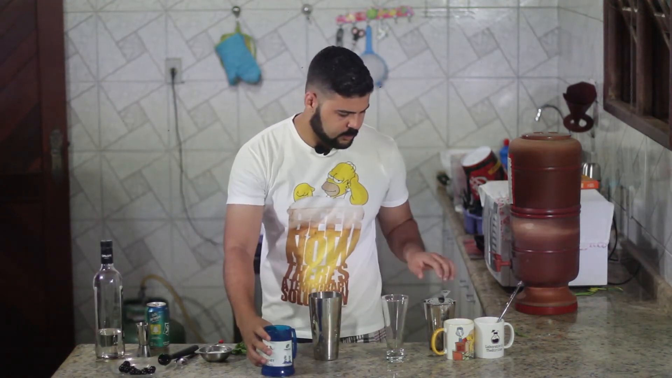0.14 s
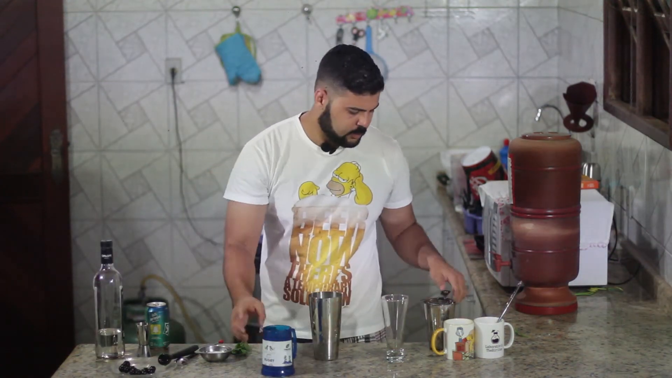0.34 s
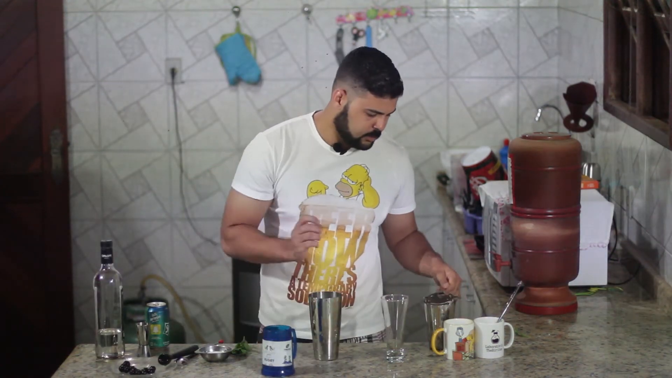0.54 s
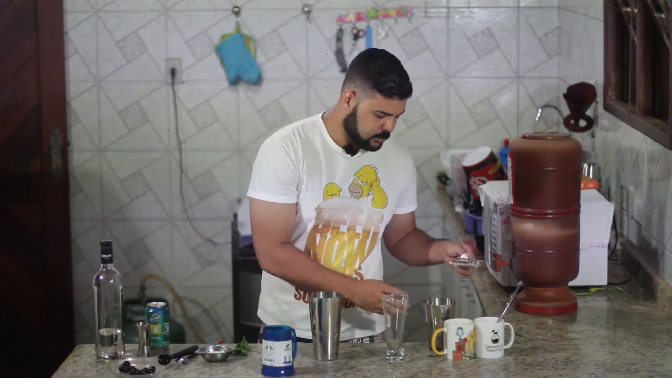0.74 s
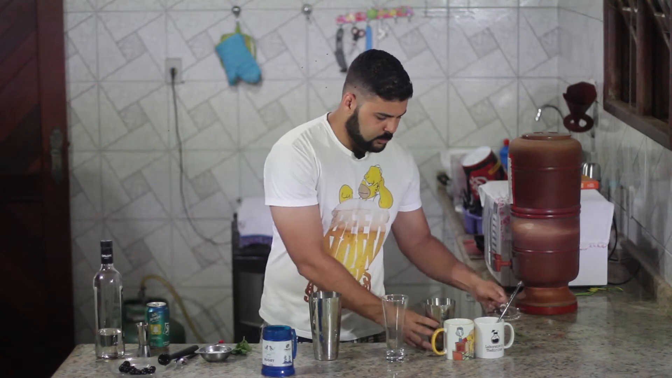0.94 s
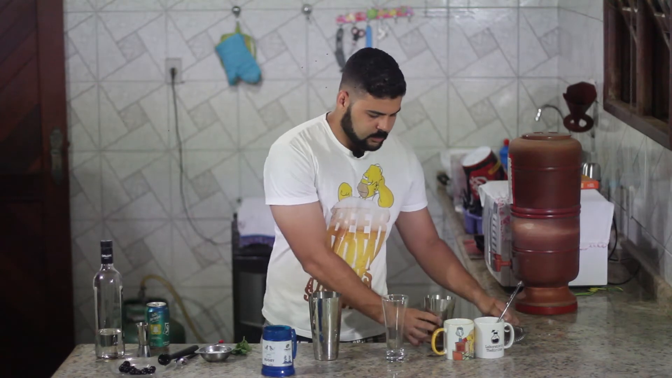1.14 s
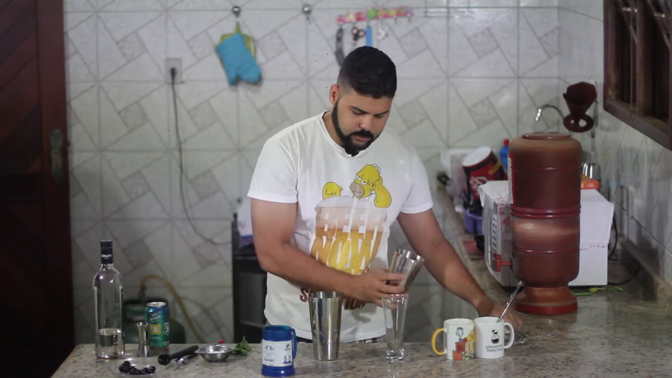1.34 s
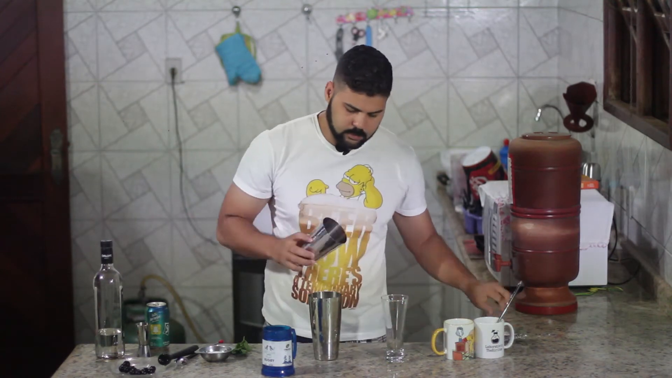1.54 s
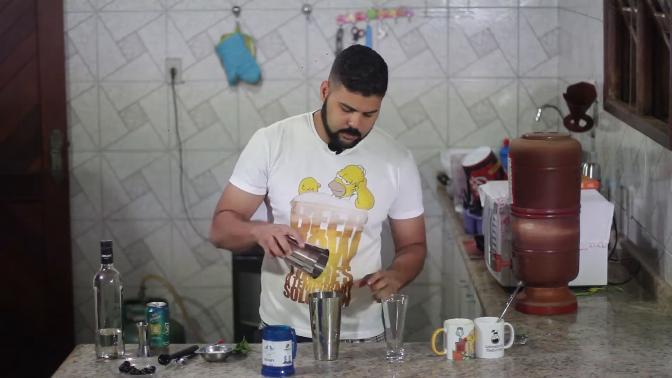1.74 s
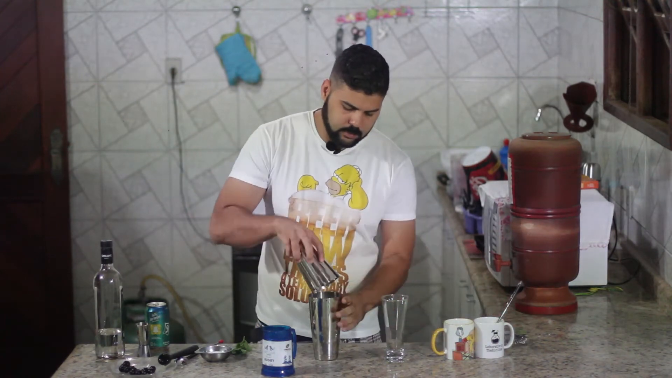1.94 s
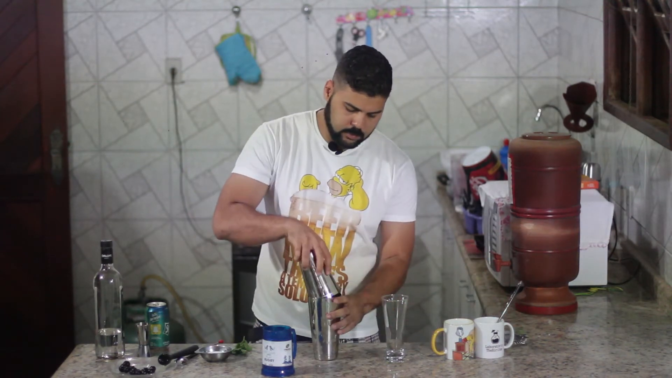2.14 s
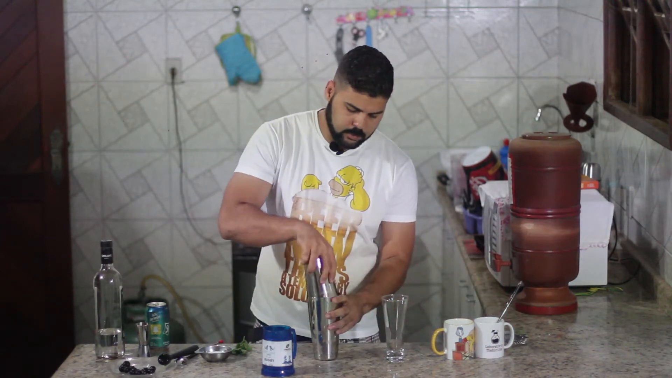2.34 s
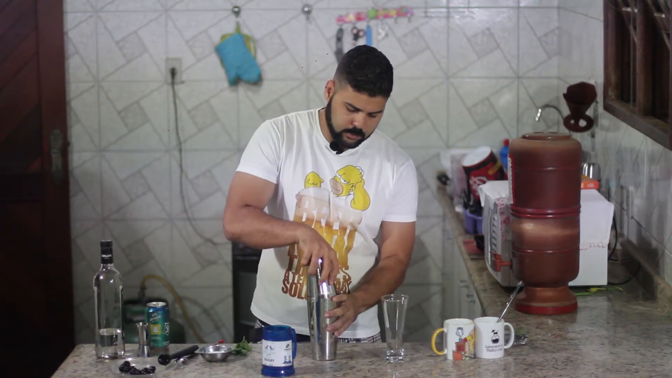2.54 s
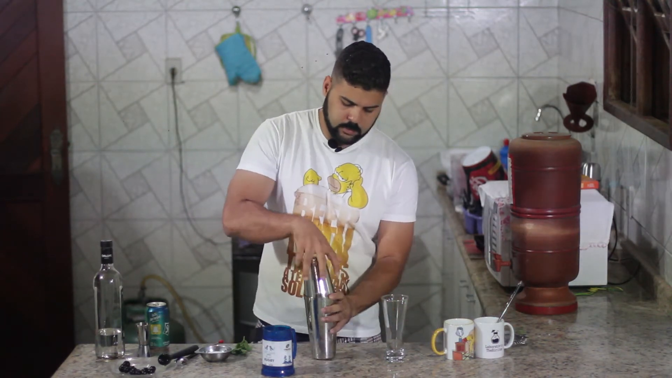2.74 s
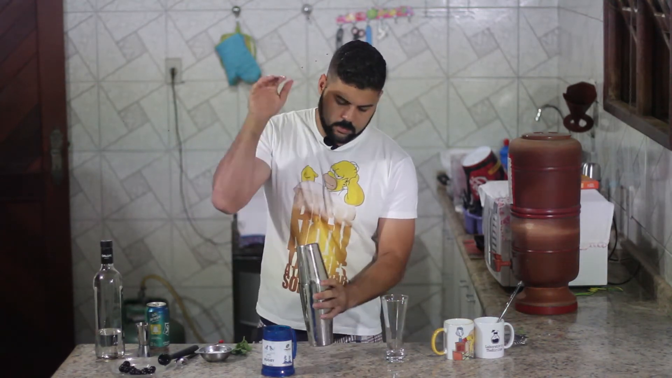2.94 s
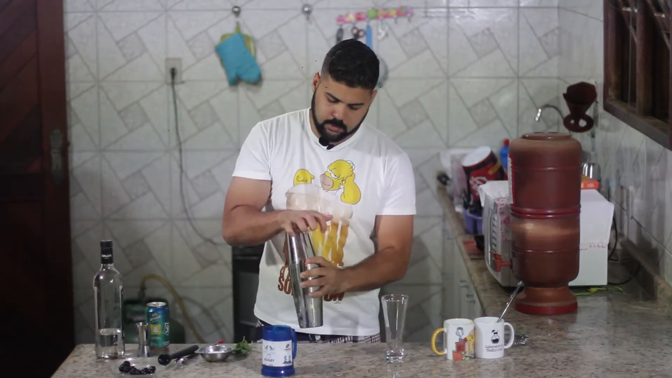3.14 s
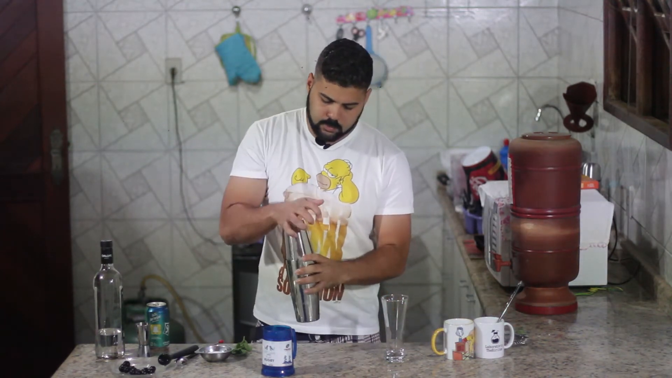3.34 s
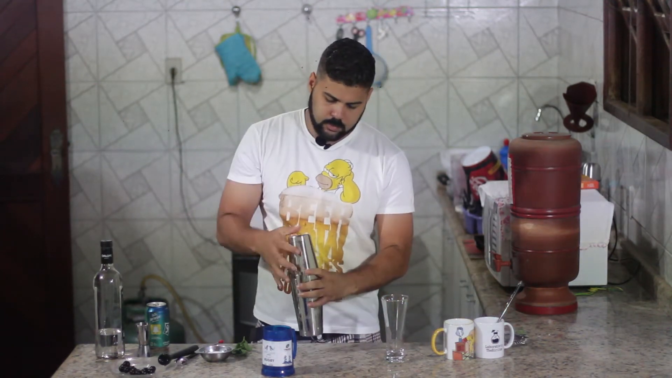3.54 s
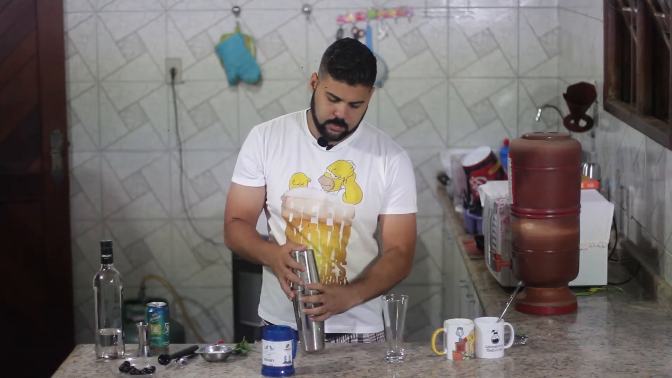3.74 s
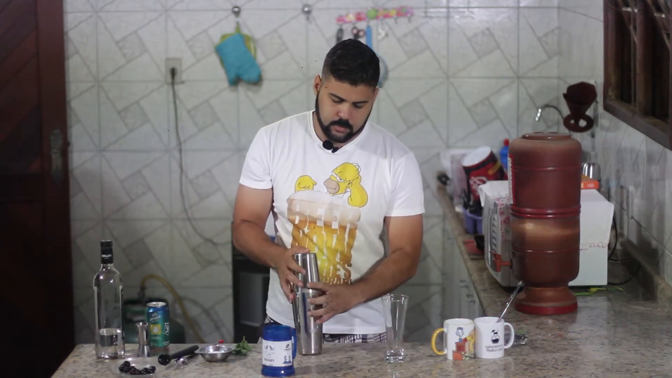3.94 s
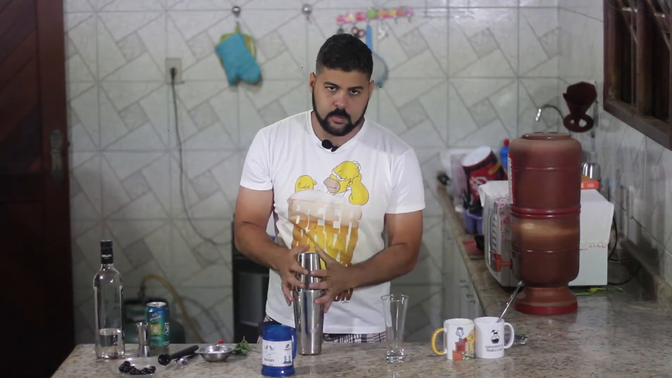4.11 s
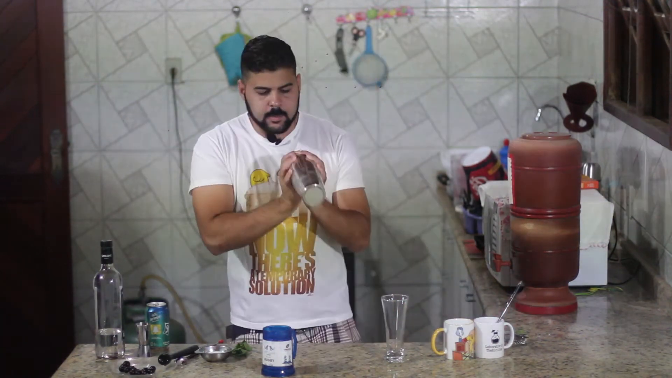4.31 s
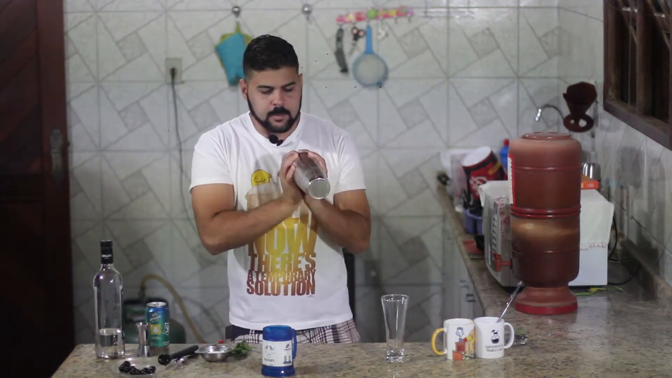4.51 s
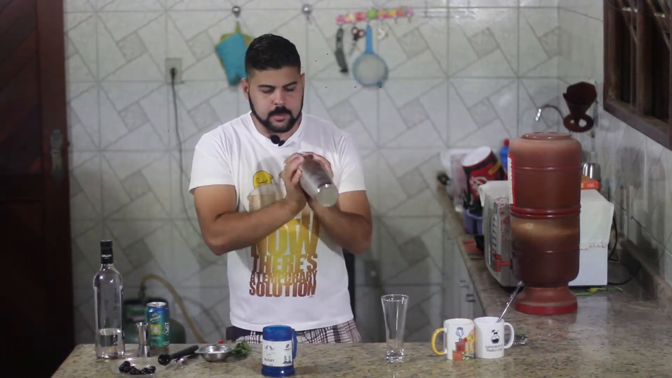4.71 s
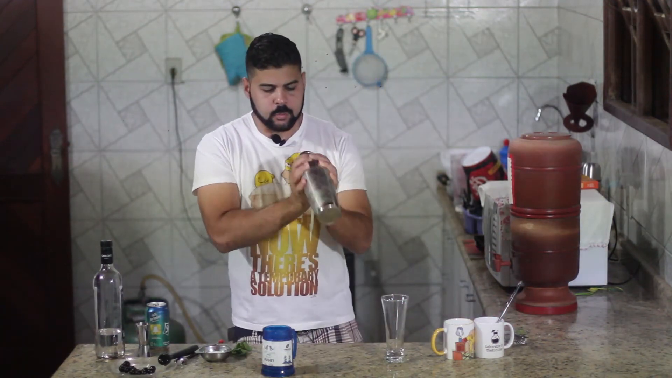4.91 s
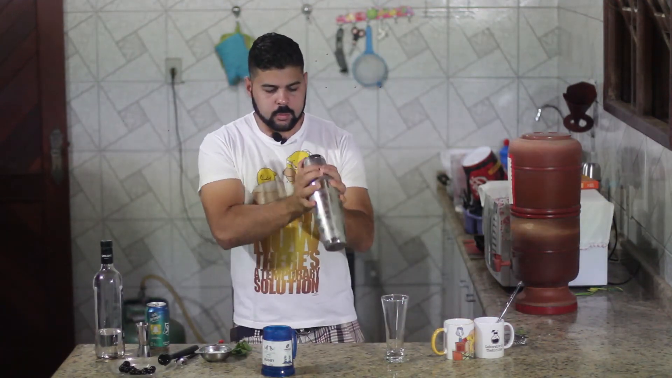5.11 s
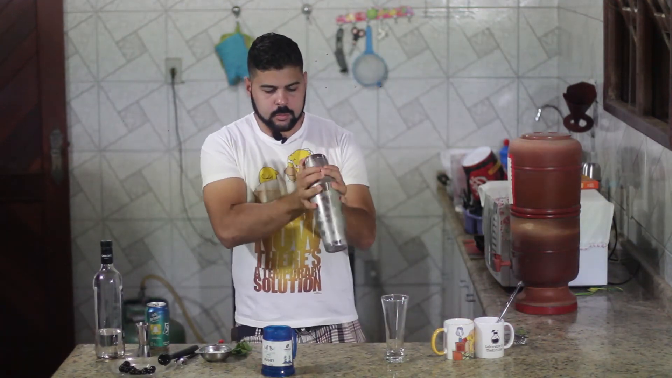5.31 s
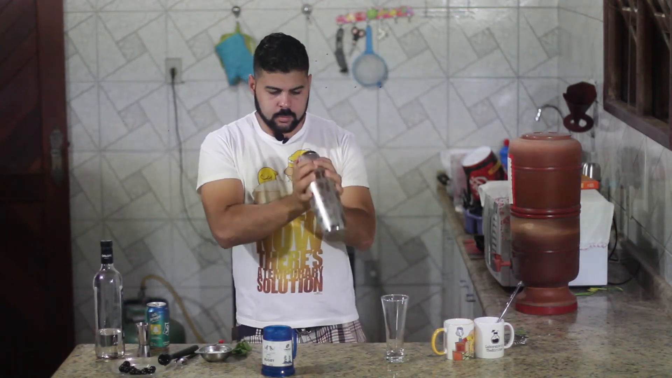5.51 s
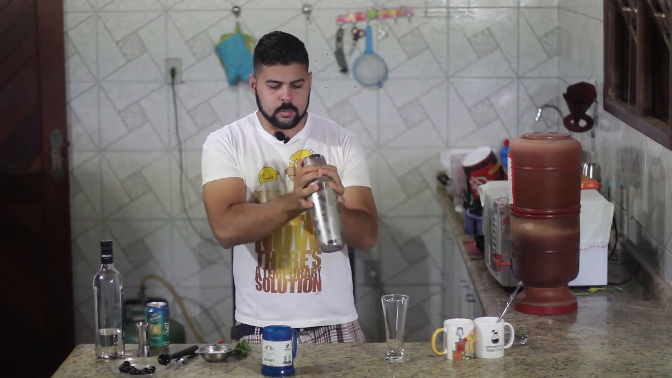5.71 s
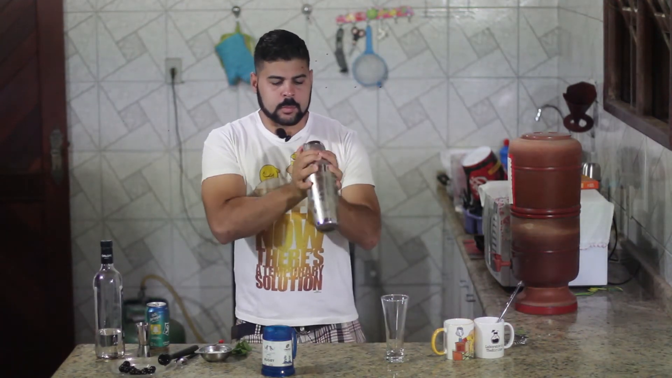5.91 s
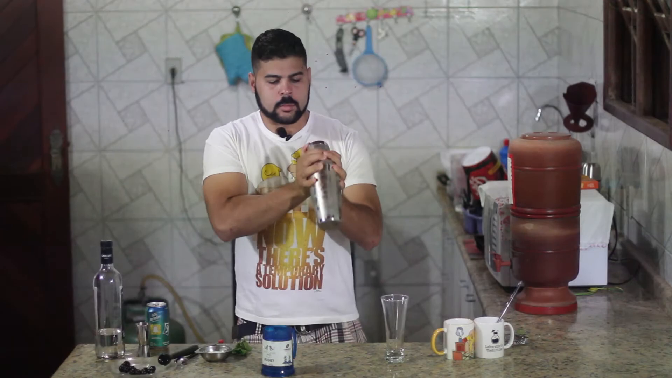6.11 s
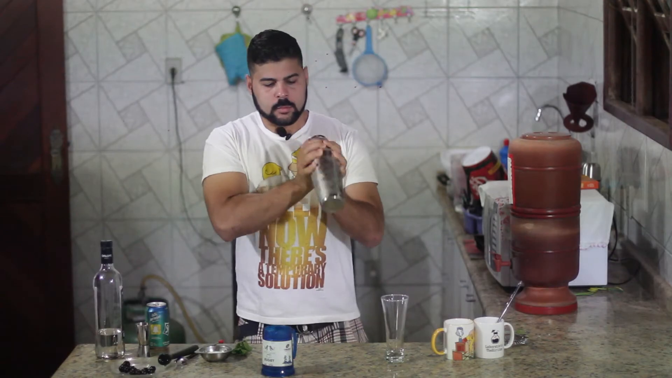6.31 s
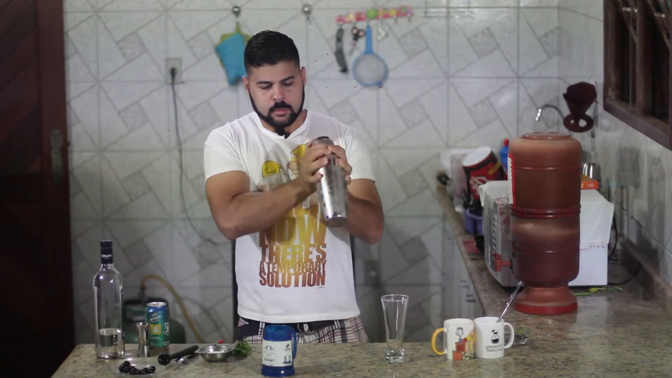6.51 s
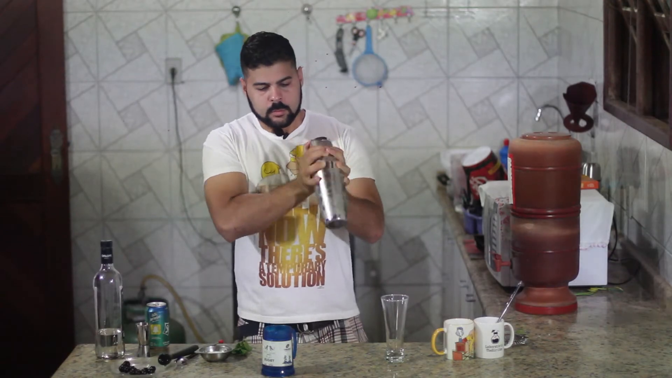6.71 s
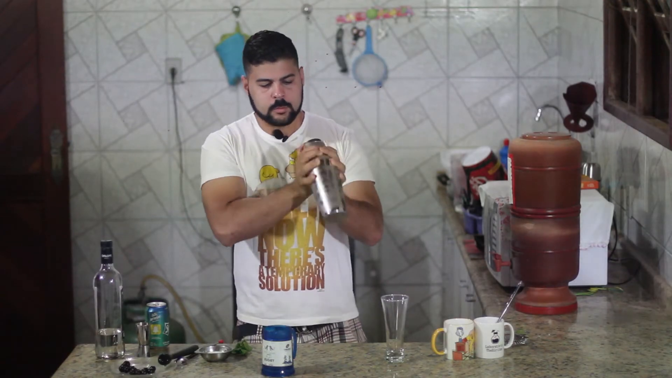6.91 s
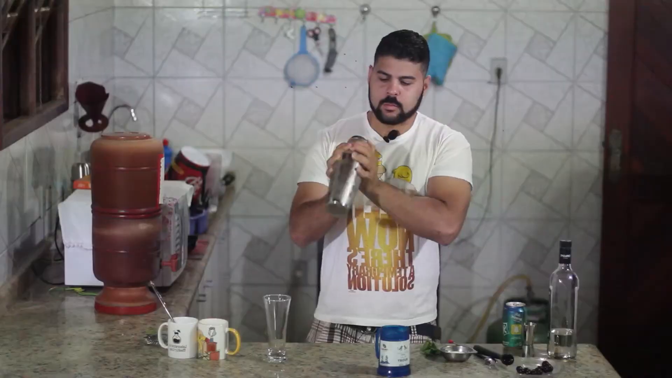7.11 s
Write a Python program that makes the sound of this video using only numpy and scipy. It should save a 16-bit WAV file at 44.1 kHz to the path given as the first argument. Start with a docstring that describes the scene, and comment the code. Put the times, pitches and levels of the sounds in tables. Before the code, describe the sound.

A jar knocks on stone, steel lids clink, and a cocktail shaker is slapped shut, set down, then shaken hard with rattling ice.

```python
"""Ice in a steel shaker

A tiled kitchen from a chest microphone. A jar knocks on a stone counter; steel lids slide, clink and
are fitted. A palm slaps the shaker shut; it is set down, then shaken hard. The load lands at lid and
base in turn: ice cracks on the wall, the tin rings, chips and liquid rattle between the blows.
Knocks are filtered bursts plus decaying modes; friction and rattle are filtered random clicks."""
import sys
import numpy as np
from scipy import signal
from scipy.io import wavfile
from scipy.ndimage import uniform_filter1d

SR = 44100
rng = np.random.default_rng(int(sys.argv[2]) if len(sys.argv) > 2 else 0)


def unload_wav(signal):
    """Save mono or channel-first audio to the path in sys.argv[1] as 16-bit WAV at rate SR, clipped to [-1, 1]."""
    wavfile.write(
        sys.argv[1],
        SR,
        np.round(np.clip(np.atleast_2d(signal).T, -1, 1) * 32767).astype(np.int16),
    )


N = 320166

# Knocks: t/s, level/dB
JAR_HITS = [(.1265, -2.5)]
CLINK_HITS = [(0.6322, -19)]
CUP_HITS = [(0.634, -19), (1.142, -43), (1.154, -31)]
FIT_HITS = [(2.106, -24), (2.12, -18), (2.18, -24), (2.53, -40)]
SLAP_HITS = [(3.1838, -28), (3.186, -1.5)]
CRACK_HITS = [(3.2041, -10), (3.2794, -14), (3.3598, -21), (3.4052, -25), (3.454, -19), (3.5354, -22),
              (4.1943, -20), (4.2342, -10), (4.3071, -17), (4.3215, -15), (4.3824, -11), (4.3949, -7),
              (4.4123, -9), (4.4218, -4), (4.4767, -6), (4.5096, -9), (4.6179, -23), (4.6179, -7),
              (4.6463, -21), (4.6613, -6.5), (4.7545, -8.5), (4.8483, -13), (4.8838, -11), (4.9646, -10),
              (5.1397, -19), (5.1561, -9), (5.1676, -7), (5.2345, -8), (5.3327, -10), (5.3871, -15),
              (5.434, -17), (5.447, -2.5), (5.5238, -14), (5.6111, -9), (5.7648, -9.5), (5.8226, -8),
              (5.8835, -13), (5.9558, -9), (5.9818, -12), (5.9997, -8), (6.0262, -7), (6.0975, -11.5),
              (6.1249, -8.5), (6.1833, -5.5), (6.2781, -8), (6.301, -3), (6.4123, -11), (6.4956, -12),
              (6.5295, -11), (6.5435, -3.5), (6.5764, -12), (6.5854, -10), (6.6228, -5.5), (6.6692, -9),
              (6.6847, -6), (6.7171, -12), (6.735, -7), (6.7485, -10), (6.766, -5.5), (6.7964, -8.5),
              (6.9101, -12), (6.9101, -2.5), (6.9341, -1.5), (6.963, -6), (6.981, -3), (7.0683, -12),
              (7.1346, -2.5), (7.1651, 1.5), (7.203, -17), (7.203, -5.5)]
SET_DOWN_HITS = [(3.882, -2), (3.904, -3)]
# Contact spectra: f/Hz, density/dB
JAR_THUD = [(100, -52), (300, -6.5), (600, -6), (1200, -6), (2000, -17), (4300, -22), (7500, -27.5),
            (16000, -65.5)]
FIT_THUD = [(120, -28), (500, 5), (1300, -15), (1510, -6.5), (3040, -21.5), (6500, -32)]
SLAP_THUD = [(29, -54), (50, -2), (200, 2.5), (330, -4.5), (700, -8.5), (900, -15), (2440, -10),
             (2950, -17), (7570, -23.5), (16000, -34)]
SET_DOWN_THUD = [(29, -59), (50, -37), (85, -1), (240, -5.5), (765, -5), (1100, -12), (1820, -18.5),
                 (7570, -47.5), (16000, -65)]
LOAD_THUD = [(60, -3), (200, 0), (550, 14), (1000, 6.5), (2000, -3.5), (5000, -22)]
# Noise spectra: f/Hz, density/dB
AIR_COLOUR = [(60, -23), (120, -3), (270, -10), (650, -12), (1140, -20.5), (1430, -16.5), (1900, -27),
              (6000, -40), (15000, -58.5)]
RUMBLE_COLOUR = [(15, -34), (40, -36), (59, 12), (75, 2), (110, -18.5), (200, -63)]
STEEL_COLOUR = [(880, -2), (1500, -1), (1610, 2), (3380, -7.5), (3770, -13), (4460, -7), (5540, -8),
                (8000, 1.5), (13000, -11.5), (16000, -1.5)]
RUB_COLOUR = [(90, -71), (300, 2.5), (435, -2.5), (871, 2.5), (1170, -2), (2100, -8), (2500, -32),
              (8000, -73)]
SETTLE_COLOUR = [(120, -43), (200, -48), (1100, -7), (1500, -0.5), (1770, -5), (2020, -4), (6280, -14),
                 (16000, -29)]
CHIP_COLOUR = [(1500, -30.5), (3200, 0.5), (4000, -9.5), (5000, -3), (6300, 5.5), (8500, -2.5),
               (11000, -10), (16000, -22)]
SLUSH_COLOUR = [(100, -39), (250, -15.5), (600, -3.5), (900, -7.5), (1300, 1.5), (2000, 1.5), (2500, 2),
                (3200, 3.5), (3900, -5), (7000, -39.5)]
SPRAY_COLOUR = [(4000, -39), (7000, -35), (10000, 13.5), (13000, 12), (16000, 1)]
# Struck modes: f/Hz, level/dB, t60/s
JAR_MODES = [(279.5, -9, 0.061), (376, -9, 0.12)]
CUP_MODES = [(2360, 0, .3), (2729, -6, .65), (4522, -17, .4), (5173, -18, .5), (5484, -23, .95),
             (6562, -24, .7), (6831, -9, .33), (7068, -20, .45), (8300, -22, .3), (10260, -25, .4),
             (11620, -28, .25)]
STONE_MODES = [(387, -4.5, 0.079), (680, 2.5, 0.075), (750, 4.5, 0.024)]
OPEN_TIN_MODES = [(515, 0, 0.056), (985, -12.5, .15), (1477.5, -14.5, 0.62), (2770, -23, 0.12),
                  (4480, -18, 0.042), (6900, -15, 0.039)]
FULL_TIN_MODES = [(83, -12, 0.63), (2250, -18, 0.38)]
# Swells: peak t/s, level/dB, rise/s, t60/s
RUMBLE_SWELLS = [(1.53, -47, 0.047, 0.16), (1.88, -43.5, 0.056, 0.33), (3.752, -50, 0.083, 0.24)]
RUB_SWELLS = [(2.2, -49, .01, 0.35), (2.536, -48.5, 0.19, 1), (3.036, -56, 0.11, 0.49)]
# Envelopes, lists of: t/s, level/dB
CREAK_CURVES = [
    [(1.36, -70), (1.41, -57), (1.49, -54.5), (1.56, -88)],
]
SETTLE_CURVES = [
    [(3.19, -15), (3.25, -20), (3.59, -33.5), (3.8, -103)],
]
# Jar cavity: t/s, level/dB, f/Hz, t60/s
JAR_AIR = [(.128, -13, 778, 0.25), (.134, 1, 740, 0.078), (.176, -6, 730.3, 0.19)]
# Room decay: f/Hz, t60/s
ROOM_DECAY = [(100, 0.4), (600, 0.53), (2000, 0.57), (6000, 0.37), (14000, 0.35)]
# Lid slides: peak t/s, level/dB, rise/s, t60/s, ring/dB, ring tilt/(dB/octave)
SLIDES = [(0.582, -46, 0.052, 0.081, -9, -5), (0.616, -37, 0.018, 0.14, 4, 0),
          (1.159, -46, 0.02, 0.24, 1, 8), (1.343, -43.5, 0.013, 0.29, -8, 8),
          (1.477, -54.5, 0.059, 0.13, -15, 9), (1.80, -49, 0.024, 0.25, -6.5, -1),
          (2.121, -37, 0.016, 0.063, -6.5, -18), (2.189, -41, 0.013, 0.23, -8, -11),
          (2.265, -44, 0.016, 0.24, -11, -4), (2.39, -52, 0.034, 0.11, -7, -26)]
# Lid modes: f/Hz, width/Hz, level/dB
LID_MODES = [(4500, 110, -6), (5150, 60, -5), (6842, 60, -2), (7570, 40, -4), (8260, 90, 0), (9320, 50, -5),
             (10300, 50, -6), (10850, 90, -9), (12100, 60, -8), (13200, 50, -7)]
# Pitched taps: t/s, level/dB, f/Hz
TICKS = [(0.978, -53, 2730), (2.7894, -52, 3380)]
CLANKS = [(4.3211, -9, 1700), (4.414, -13, 2050), (4.9788, -13, 1980), (5.0769, -8.5, 1810),
          (5.1578, -16.5, 2020), (5.2502, -13, 2000), (5.369, -15, 2010), (5.4487, -10, 1700),
          (5.5414, -12, 2090), (6.0187, -14, 1870), (6.1262, -11.5, 2010), (6.2038, -12.5, 1900),
          (6.3087, -15, 2060), (6.5315, -11.5, 2980), (6.6204, -18, 1940), (6.7168, -10.5, 2080),
          (6.7375, -11.5, 1990), (6.9036, -8.5, 2120), (6.9629, -6, 1885), (7.0977, -15, 1950),
          (7.1665, -7.5, 1810), (7.2047, -9, 1930)]
# Faint tones: start/s, end/s, f/Hz, level/dB
HUMS = [(2.53, 2.8, 878, -51), (2.48, 2.62, 2090, -58)]
# Load landings, lid and base in turn: t/s, slush/dB, chips/dB, thump/dB, ring/dB, ring t60/s
STROKES = [(4.236, -18.5, -22, -20, -19, 0.059), (4.3206, -18.5, -20.5, -28, -4.5, 0.024),
           (4.415, -19, -18.5, -19.5, -39, 0.043), (4.509, -19.5, -20.5, -18.5, -19, 0.025),
           (4.615, -23, -22.5, -21.5, -16.5, 0.03), (4.695, -17, -18.5, -23.5, -7.5, 0.092),
           (4.79, -30, -20.5, -25.5, -42, .05), (4.884, -17.5, -20.5, -27, -11.5, 0.14),
           (4.968, -23, -23, -19.5, -22, 0.073), (5.073, -20, -18.5, -25.5, -14, 0.11),
           (5.159, -21.5, -24.5, -23.5, -30, 0.06), (5.25, -21.5, -18.5, -29, -15.5, 0.15),
           (5.366, -29, -24.5, -27, -20.5, 0.033), (5.4486, -20.5, -25, -22, -5.5, 0.047),
           (5.544, -20, -20, -22.5, -39, 0.055), (5.640, -24.5, -21.5, -25.5, -11, 0.053),
           (5.765, -51, -30, -43, -47, 0.055), (5.839, -21.5, -20.5, -24.5, -19.5, 0.18),
           (5.954, -28, -22.5, -28, -20, 0.075), (6.0264, -20, -19, -19.5, -4.5, 0.14),
           (6.126, -29, -22, -23, -37, 0.033), (6.2207, -17.5, -17.5, -20, -21, 0.12),
           (6.309, -24.5, -20.5, -20, -38, 0.036), (6.421, -19, -21, -32, -14.5, 0.025),
           (6.4956, -23, -22.5, -18, -14.5, 0.037), (6.6225, -17, -17.5, -29, -9.5, 0.026),
           (6.7176, -25, -21.5, -23, -19, 0.032), (6.801, -20, -20, -48, -18.5, 0.083),
           (6.905, -26, -24, -23, -16.5, 0.024), (7.004, -15.5, -18, -49, -19, 0.061),
           (7.098, -24, -18.5, -26, -30, 0.13), (7.166, -19, -24, -28, -12.5, 0.082)]
# Rattle shape at lid, at base: lag/s, rise/s, fall/s
SLUSH_SURGE = [(0.0095, 0.0067, 0.021), (0.0022, 0.012, 0.014)]
CHIP_SURGE = [(0.0038, 0.015, 0.017), (0.0013, 0.017, 0.01)]
# Treble flares: t/s
FLARES = [4.197, 4.385, 4.58, 4.76, 4.966, 5.141, 5.334, 5.525, 5.72, 5.884, 6.098, 6.278, 6.495, 6.67,
          6.872, 7.068]
# Jolt strength: t/s, level/dB
JOLT_CURVE = [(4.3, -42), (4.88, -25.5), (5.45, -40), (6.03, -30.5), (6.6, -50), (7.0, -29), (7.2, -31)]

TIN_HZ, SHAKE_START_S = 1458.3, 4.193


def amp(db):
    """Decibels to gain."""
    return 10 ** (np.asarray(db) / 20)


def unit_rms(x):
    """Scales to rms 1."""
    return x / np.sqrt(np.mean(x ** 2) + 1e-20)


def at_hz(points, hz):
    """Interpolates over log frequency."""
    f, value = np.transpose(points)
    return np.interp(np.log(hz + 1), np.log(f + 1), value)


def envelope(curves):
    """Smoothed gain from dB curves, silent outside them."""
    t, out = np.arange(N) / SR, np.zeros(N)
    for rows in curves:
        s, db = np.transpose(rows)
        out += amp(np.interp(t, s, db, -200, -200))
    return uniform_filter1d(out, size=60)


def swells(rows):
    """Gain with Gaussian rises and exponential decays."""
    t, out = np.arange(0, N, 32) / SR, 0
    for s, db, rise_s, t60_s in rows:
        out = out + amp(db - np.where(t < s, 20 * ((s - t) / rise_s) ** 2, 60 * (t - s) / t60_s))
    return np.interp(np.arange(N) / SR, t, out)


def colour(x, spectrum):
    """Minimum-phase filter of unit energy."""
    half = np.log(amp(np.maximum(at_hz(spectrum, np.fft.rfftfreq(8192, 1 / SR)), -100)))
    log_gain = np.concatenate([half, half[-2:0:-1]])
    taps = np.fft.ifft(np.exp(log_gain - 1j * signal.hilbert(log_gain).imag)).real[:4096]
    return signal.oaconvolve(x, taps / np.linalg.norm(taps))[:len(x)]


def resonate(x, hz, width_hz):
    """Two-pole resonance, peak gain 1."""
    return signal.lfilter(*signal.iirpeak(hz, hz / width_hz, SR), x)


def add(mix, s, sound):
    """Mixes a sound in at s seconds."""
    part = mix[round(s * SR):][:len(sound)]
    part += sound[:len(part)]


def grit(per_s, spread_db):
    """Random clicks, a few large."""
    size = amp(spread_db * np.minimum(rng.exponential(1, N), 3.8)) * rng.choice([-1, 1], N)
    return unit_rms(size * (rng.random(N) < per_s / SR))


def crunch(per_s, spread_db, decay_s):
    """Random noise bursts: ice grinding as it hits."""
    bursts = signal.lfilter([1], [1, -np.exp(-1 / (decay_s * SR))], abs(grit(per_s, spread_db)))
    return unit_rms(bursts * rng.standard_normal(N))


def ring(hz, t60_s, rise_s=0.00012, choke=1):
    """One decaying mode; choke > 1 holds it, then cuts it short."""
    t = np.arange(round(SR * min(t60_s, 1))) / SR
    return amp(-60 * (t / t60_s) ** choke) * (1 - np.exp(-t / rise_s)) * np.sin(2 * np.pi * hz * t)


def cluster(hz, octaves, t60_s):
    """Wall modes around hz, struck together."""
    return sum(ring(hz * 2 ** shift, t60_s, rise_s=0.00049) for shift in octaves)


def wall_grains(gain, per_s, band_hz, t60_s):
    """Each small collision rings one patch of the wall."""
    pitches, out = np.geomspace(*band_hz, num=10), np.zeros(N)
    hits = gain * grit(per_s, 4.2)
    patch = rng.integers(len(pitches), size=N)
    for k, hz in enumerate(pitches):
        out += signal.oaconvolve(hits * (patch == k), unit_rms(ring(hz, t60_s, rise_s=0.0001)))[:N]
    return out


def knocks(hits, thud, thud_db, contact_s, modes=(), ring_db=0, click=1):
    """Coloured click and contact noise, plus modes; click is the click-to-noise ratio."""
    contacts, rings, t = np.zeros(N), np.zeros(N), np.arange(2000) / SR
    for s, db in hits:
        burst = rng.standard_normal(len(t)) * np.exp(-t / contact_s)
        burst[0] = click * np.linalg.norm(burst)
        add(contacts, s, amp(db + thud_db) * burst / np.linalg.norm(burst))
        for hz, mode_db, t60_s in modes:
            add(rings, s, amp(db + ring_db + mode_db) * ring(hz, t60_s))
    return colour(contacts, thud) + rings


def room_noise():
    """Steady air and a swelling low rumble."""
    air = amp(-59.5) * colour(rng.standard_normal(N), AIR_COLOUR)
    rumble = (amp(-54) + swells(RUMBLE_SWELLS)) * colour(rng.standard_normal(N), RUMBLE_COLOUR)
    return air + rumble


def jar_down():
    """Hard, flat blow of a jar on stone."""
    return knocks(JAR_HITS, JAR_THUD, 1.6, contact_s=0.0005, modes=JAR_MODES, ring_db=-17, click=4)


def jar_hollow():
    """The jar's cavity sounds as it rocks."""
    out = np.zeros(N)
    for s, db, hz, t60_s in JAR_AIR:
        add(out, s, amp(db) * ring(hz, t60_s, rise_s=0.0057))
    return out


def kitchen_reverb(x):
    """Sparse reflections of random sign; each band decays at its own rate."""
    taps, slots = np.zeros(SR), np.arange(80, SR - 20, 20)
    taps[slots + rng.integers(0, 20, len(slots))] = rng.choice([-1., 1.], len(slots))
    hz, t, bands = signal.stft(taps, SR, nperseg=256)
    decay = amp(-60 * t / at_hz(ROOM_DECAY, hz)[:, None])
    tail = signal.istft(bands * decay, SR, nperseg=256)[1]
    return signal.fftconvolve(x, tail / np.linalg.norm(tail))[:N]


def lid_slides():
    """Rough contact hisses and drives the lid's modes; each grip damps them differently."""
    friction, out = grit(6000, 3.2), np.zeros(N)
    modes = np.array([amp(db) * resonate(friction, hz, width_hz) for hz, width_hz, db in LID_MODES])
    modes /= np.std(modes.sum(0))
    hiss = amp(-3.5) * colour(friction, STEEL_COLOUR)
    octaves = np.log2(np.array(LID_MODES)[:, 0] / LID_MODES[2][0])
    for *shape, ring_db, tilt_db in SLIDES:
        grip_db = -14 * rng.random(len(LID_MODES))
        singing = amp(ring_db + grip_db + tilt_db * octaves) @ modes
        out += swells([shape]) * (hiss + singing)
    return out


def cup_clink():
    """A tap rings a steel cup's high modes."""
    return knocks(CLINK_HITS, STEEL_COLOUR, 7.8, contact_s=0.0017, modes=CUP_MODES, ring_db=-20.5)


def cup_down():
    """The cup knocks on stone: low, short modes."""
    return knocks(CUP_HITS, JAR_THUD, 9.4, contact_s=0.0029, modes=STONE_MODES, ring_db=-10.5)


def ticks():
    """Faint ticks, one mode each."""
    out = np.zeros(N)
    for s, db, hz in TICKS:
        add(out, s, amp(db) * ring(hz, t60_s=0.011, rise_s=0.00016))
    return out


def creak():
    """A brief run of tiny pitched clicks."""
    return amp(-27.5) * wall_grains(envelope(CREAK_CURVES), 270, band_hz=(1840, 3340), t60_s=0.011)


def lid_fit():
    """The lid knocks on the open tin and rings it."""
    return knocks(FIT_HITS, FIT_THUD, 9.3, contact_s=0.0048, modes=OPEN_TIN_MODES, ring_db=-15)


def hand_rub():
    """Dull friction of hands on the tin."""
    return amp(-3) * swells(RUB_SWELLS) * colour(rng.standard_normal(N), RUB_COLOUR)


def hums():
    """Two faint tones swell and fade."""
    out = np.zeros(N)
    for start_s, end_s, hz, db in HUMS:
        t = np.arange(round((end_s - start_s) * SR)) / SR
        add(out, start_s, amp(db) * np.sqrt(np.hanning(len(t))) * np.sin(2 * np.pi * hz * t))
    return out


def palm_slap():
    """A flat blow shuts the shaker; one low mode rings."""
    modes = [(204.3, 0.0026, 0.31)]
    return knocks(SLAP_HITS, SLAP_THUD, 12.9, contact_s=0.0032, modes=modes, ring_db=-30, click=4)


def ice_settle():
    """Ice shifts in the tin: dense grit, sparse bright chips."""
    dense = amp(-9.5) * colour(grit(2500, 1.3), SETTLE_COLOUR)
    chips = amp(-20) * colour(grit(200, 2.7), CHIP_COLOUR)
    return envelope(SETTLE_CURVES) * (dense + chips)


def ice_cracks(chink_hz=6380):
    """Brief ice-on-steel contacts: a bright burst and a three-mode chink."""
    out = knocks(CRACK_HITS, CHIP_COLOUR, 6.8, contact_s=0.0018, click=0.9)
    out += knocks(CRACK_HITS, SPRAY_COLOUR, -5.5, contact_s=0.0018, click=0.9)
    for s, db in CRACK_HITS:
        octaves = rng.uniform(-0.406, 0.457, 3)
        add(out, s, amp(db - 10) * cluster(chink_hz, octaves, t60_s=0.016))
    return out


def shaker_down():
    """The full tin knocks twice on the counter."""
    return knocks(SET_DOWN_HITS, SET_DOWN_THUD, 12.7, contact_s=0.0026,
                  modes=FULL_TIN_MODES, ring_db=-18.5)


def surge(shapes, column, floor_db):
    """Rattle gain: each stroke throws the load against an end."""
    t, power = np.arange(0, N, 32) / SR, amp(floor_db) ** 2
    for k, stroke in enumerate(STROKES):
        lag_s, rise_s, fall_s = shapes[k % 2]
        late_s = t - stroke[0] - lag_s
        width_s = np.where(late_s < 0, rise_s, fall_s)
        power = power + amp(stroke[column]) ** 2 * np.exp(-0.5 * (late_s / width_s) ** 2)
    return np.repeat(np.sqrt(power) * (t > SHAKE_START_S), 32)[:N]


def rattle():
    """Dull slush and bright chips strike the wall; the slush also drives the tin's mode."""
    slush_gain = surge(SLUSH_SURGE, column=1, floor_db=-28.5)
    chip_gain = surge(CHIP_SURGE, column=2, floor_db=-30)
    slush = slush_gain * grit(1800, 2.5)
    chips = chip_gain * crunch(350, 3.5, decay_s=0.0026)
    out = amp(-7) * colour(chips, CHIP_COLOUR) + amp(-9.5) * colour(slush, SLUSH_COLOUR)
    out += amp(-27) * wall_grains(chip_gain, 650, band_hz=(4750, 8660), t60_s=0.0022)
    out += amp(-36) * wall_grains(slush_gain, 500, band_hz=(1240, 2130), t60_s=0.012)
    return out + amp(8.5) * resonate(slush, TIN_HZ, width_hz=114)


def spray(db=-41, rise_s=0.0035, t60_s=0.6):
    """Fine treble flares once a swing, as the load flies toward the lid."""
    gain = swells([(s, db, rise_s, t60_s) for s in FLARES])
    return gain * colour(crunch(300, 3.7, decay_s=0.00098), SPRAY_COLOUR)


def load_thumps(lead_s=0.00295):
    """The load lands: long contact, dull thud."""
    hits = [(s - lead_s, thump_db) for s, _, _, thump_db, *_ in STROKES]
    return knocks(hits, LOAD_THUD, 18.2, contact_s=0.011)


def tin_ring(spread=0.007):
    """Each landing rings the wall; hands and liquid choke all modes but the lowest."""
    out = np.zeros(N)
    for s, *_, db, t60_s in STROKES:
        hz = TIN_HZ * (1 + spread * rng.uniform(-0.059, 1))
        add(out, s, amp(db) * ring(hz, max(t60_s, 0.03), rise_s=0.0011, choke=1.65))
    return out


def mic_jolts(hz=55, width_s=0.005, lead_s=0.0367):
    """The arms jolt the diaphragm just before each landing at the base."""
    out, t = np.zeros(N), np.arange(-2000, 2000) / SR
    swing = np.exp(-0.5 * (t / width_s) ** 2) * -np.sin(2 * np.pi * hz * t)
    for s, *_ in STROKES[1::2]:
        db = np.interp(s, *np.transpose(JOLT_CURVE))
        add(out, s - lead_s + t[0], amp(db) * swing)
    return out


def cube_clanks():
    """Big cubes knock the held wall: a main mode and five around it."""
    out = np.zeros(N)
    for s, db, hz in CLANKS:
        octaves = rng.uniform(-0.448, 0.81, 5)
        add(out, s, amp(db) * ring(hz, t60_s=0.03, rise_s=0.00026))
        add(out, s, amp(db - 8.5) * cluster(hz, octaves, t60_s=0.021))
    return out


def scene():
    """The counter is far and wet; the shaker at the chest is near and dry."""
    counter = jar_down() + cup_clink() + palm_slap() + shaker_down() + cup_down() + lid_fit()
    handling = lid_slides() + ice_settle() + hand_rub() + creak() + ticks() + jar_hollow() + hums()
    shaker = ice_cracks() + cube_clanks() + tin_ring() + rattle() + spray() + load_thumps()
    wet = kitchen_reverb(amp(2) * counter + amp(-8) * handling + amp(-11) * shaker)
    return (counter + handling + shaker + wet + room_noise() + mic_jolts())[None]


def record(dry):
    """Soft overload, then a 15.9 kHz low-pass."""
    clipped = 1.27 * np.tanh(dry / 1.32)
    lowpass = signal.firwin(511, 15900, window=("kaiser", 9), fs=SR)
    return signal.oaconvolve(clipped, lowpass[None], "same")


dry = scene()
out = record(dry)
unload_wav(out)
```